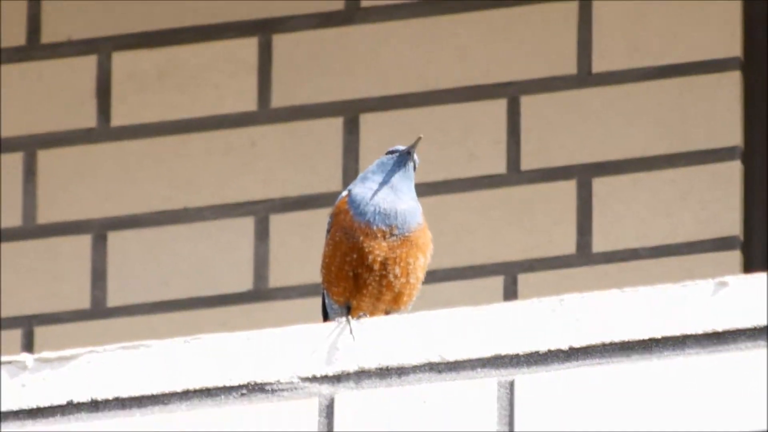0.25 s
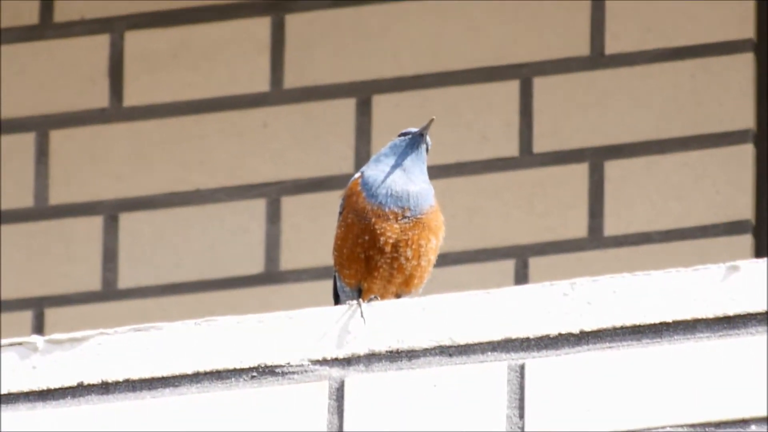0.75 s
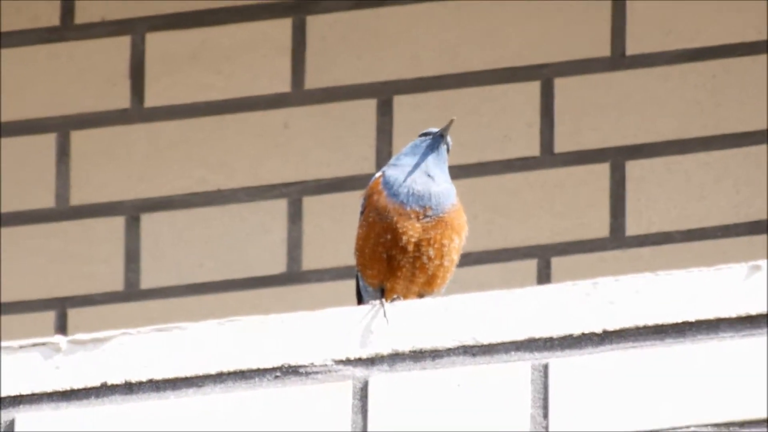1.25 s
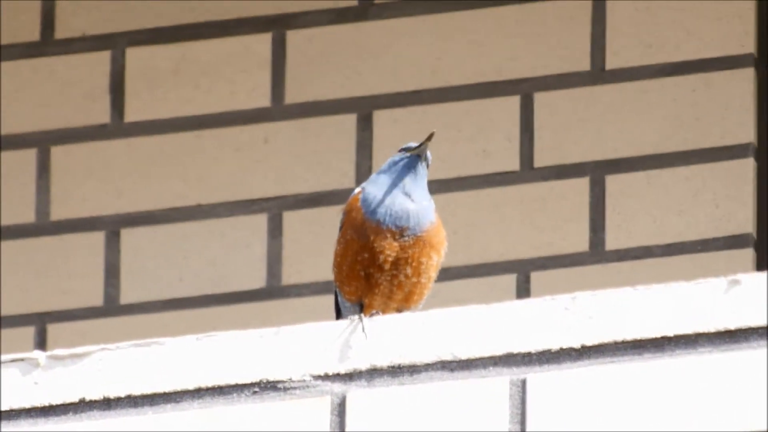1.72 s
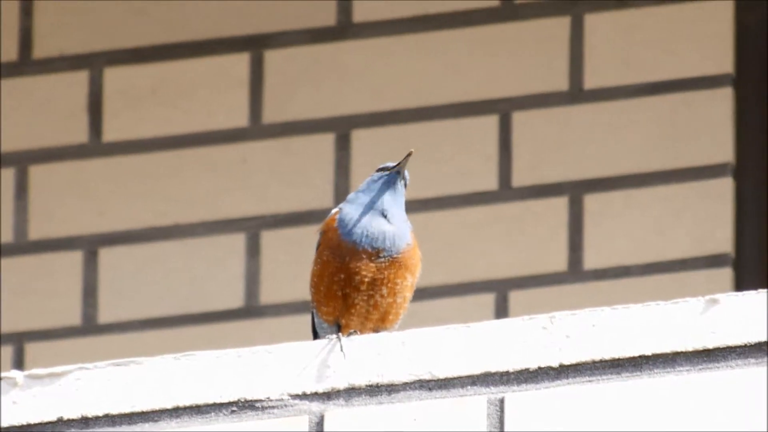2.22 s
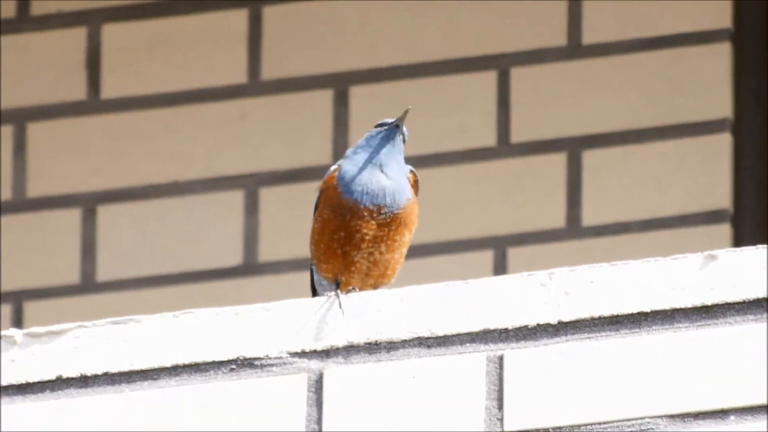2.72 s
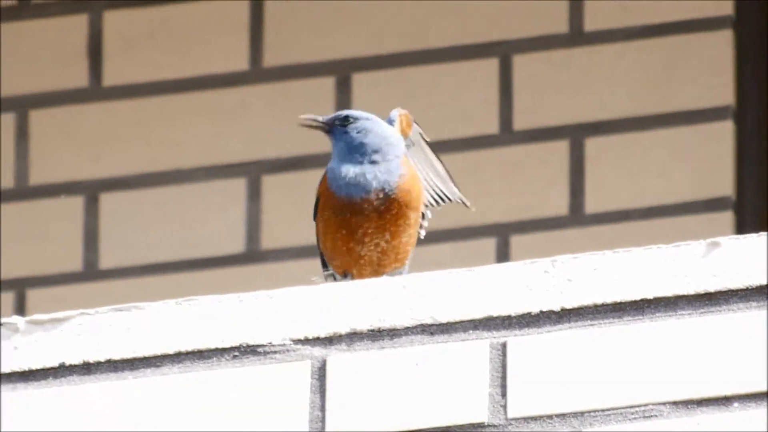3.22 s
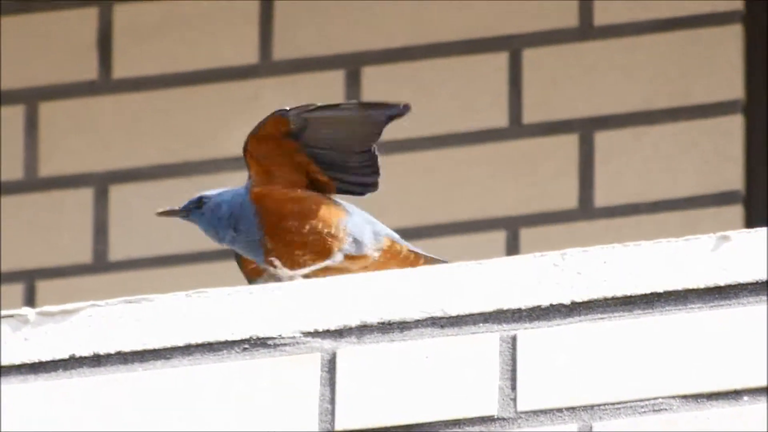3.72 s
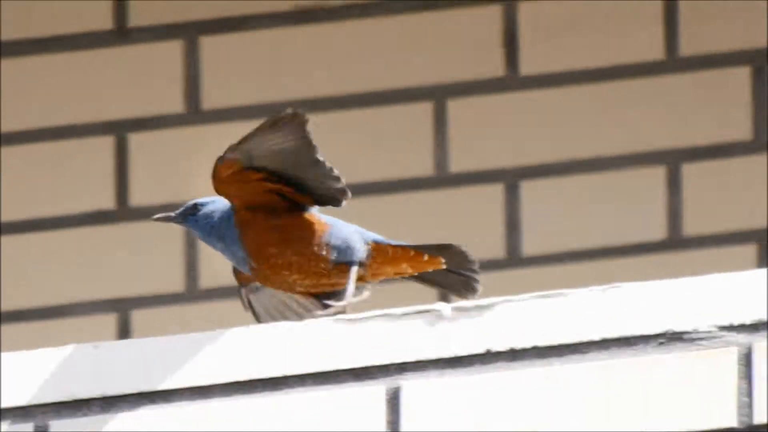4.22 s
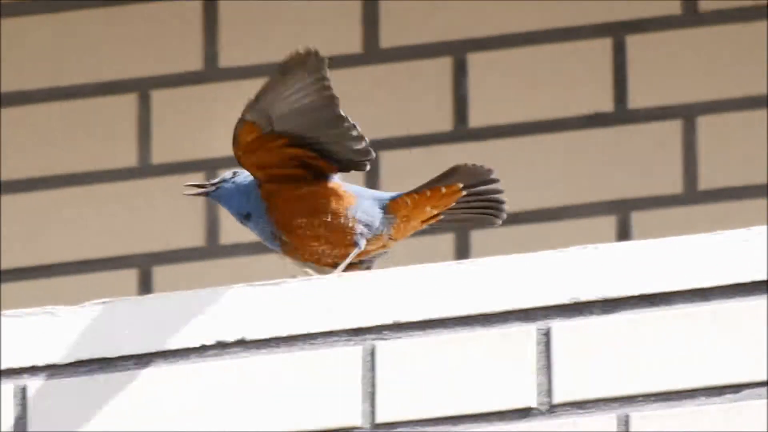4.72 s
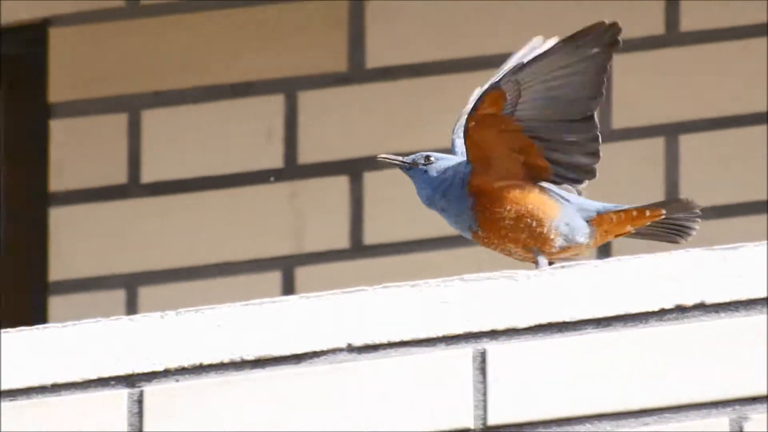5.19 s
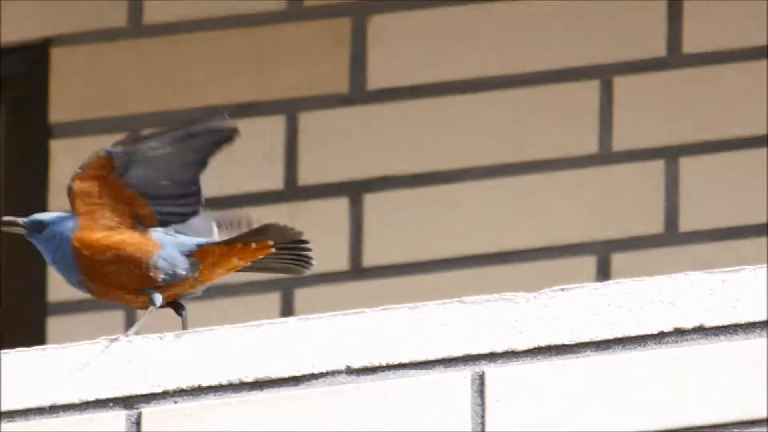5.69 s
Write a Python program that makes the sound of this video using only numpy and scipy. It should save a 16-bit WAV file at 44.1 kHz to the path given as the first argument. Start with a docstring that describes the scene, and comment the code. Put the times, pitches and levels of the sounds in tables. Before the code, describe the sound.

Loud low wind buffeting on a microphone, over distant traffic, as a perched thrush sings clear fluting notes, raspy buzzes and quick trills.

```python
"""A blue rock thrush sings on a balcony wall: clear whistles, fluttering trills and two harsh falling buzzes,
built as gliding sines with overtones and thrown back by the house fronts as echoes and a noise tail.
A sharp dry tick sounds once. Gusts rumble on the microphone as lumpy low noise, and single eddies thump it.
Behind lie random far chirps, the filtered noise of a town, a faint hum and a vehicle that draws near at the end.
The recorder's compressor ducks under the loudest peaks and recovers slowly."""
import sys
import numpy as np
from scipy import signal
from scipy.fft import rfft, irfft
from scipy.io import wavfile
from scipy.ndimage import uniform_filter1d, minimum_filter1d, map_coordinates

SR = 44100
rng = np.random.default_rng(int(sys.argv[2]) if len(sys.argv) > 2 else 0)


def store_pcm(level_fs):
    """Save levels as 16-bit WAV."""
    pcm = np.round(np.clip(level_fs, -1, 1) * 32767).astype(np.int16)
    wavfile.write(sys.argv[1], SR, np.atleast_2d(pcm).T)


N = 262395
TIME = np.arange(N) / SR

# Clear notes of the thrush. Each row: start in seconds, length in seconds, first pitch in Hz,
# last pitch in Hz, level in dB at mid-note, swell from start to end in dB.
WHISTLES = [ (1.435, 0.054, 6000, 3950, -53, 10), (1.478, 0.053, 2930, 2936, -35.5, 1),
            (1.674, 0.11, 2910, 2286, -35, 17.5), (1.851, 0.022, 6760, 6330, -46.5, 2.5),
            (2.103, 0.071, 4236, 3580, -27.5, 11.5), (2.172, 0.062, 3526, 3533, -24.5, 9),
            (2.250, 0.066, 3405, 3519, -21.5, -2), (2.34, 0.11, 3286, 3500, -27.5, -9),
            (2.459, 0.048, 1880, 2260, -38, 23), (2.789, 0.12, 6950, 6300, -54, -3),
            (3.424, 0.069, 3540, 3153, -38, 8), (3.991, 0.066, 3620, 3193, -42, 17),
            (5.149, 0.042, 4750, 4744, -23.5, -13), (5.439, 0.053, 3700, 3077, -33.5, 14),
            (5.582, 0.08, 2440, 2845, -36.5, 8), (5.765, 0.089, 7750, 7100, -53, -3)]
# Fluttering notes of the thrush. Each row: start in seconds, length in seconds, first pitch in Hz,
# last pitch in Hz, level in dB at mid-note, depth of the main flutter swing in Hz.
TRILLS = [ (.70, 0.19, 4410, 3500, -48.5, 700), (0.771, 0.047, 3550, 3150, -41, 350),
          (1.394, 0.041, 6400, 7200, -54, 300), (1.781, 0.027, 6500, 4030, -42, 1540),
          (1.835, .064, 2320, 2816, -26.5, 101), (1.896, 0.069, 2760, 3180, -22.5, 113),
          (1.962, 0.04, 3180, 2784, -24.5, 130), (2.010, 0.038, 3140, 2867, -26.5, 260),
          (2.658, .024, 2596, 3674, -33.5, 600), (2.673, 0.0425, 2995, 2490, -31, 278),
          (4.801, 0.03, 2295, 2620, -35, 250), (4.819, .022, 2700, 4660, -29, 400),
          (4.836, 0.043, 4870, 4900, -35, 260), (4.840, .055, 5430, 5350, -40, 90),
          (4.894, 0.043, 4830, 3420, -36, 198), (4.931, 0.077, 3630, 3104, -39, 170),
          (4.916, 0.11, 2520, 2230, -40.5, 120), (5.096, 0.042, 6350, 5730, -41.5, 130),
          (5.134, 0.0615, 5640, 5250, -29.5, 220), (5.120, 0.073, 4986, 4740, -27, 110),
          (5.208, 0.04, 4140, 4255, -24.5, 200), (5.286, 0.031, 3754, 4400, -27, 333)]
# Trills and squeaks share one mean flutter rate; all trills but the slow rattle swell alike.
FLUTTER_HZ, TRILL_SWELL_DB = 253.4, 3
# Harsh calls, a screech that breaks into a falling buzz. Each row: start of the screech in seconds,
# level of the buzz in dB, length of the buzz in seconds, its last pitch in Hz, its flutter rate in Hz.
BUZZES = [(3.051, -25, .119, 3983, 79.9), (3.678, -26, 0.13, 3860, 140)]
# Thin squeaks whose octave outweighs the fundamental. Each row: start in seconds, length in seconds,
# level of the fundamental in dB.
SQUEAKS = [(4.564, 0.076, -47), (4.635, 0.12, -47.5)]
# Tone of the windpipe and beak, which favour two bands. Each row: frequency in Hz, gain in dB.
BEAK = [(6000, -0.5), (7500, -1), (9700, -6.5), (11200, -2), (12200, 1), (13300, -21)]
# Echoes off nearby walls, before the walls' colour. Each row: delay in seconds, level in dB.
WALL_ECHOES = [(.0065, -5.5), (.021, -8), (.047, -14), (.079, -15)]
# Gusts on the microphone. Each row: peak time in seconds, level in dB before the common gust trim,
# build-up in seconds, dying away in seconds.
GUSTS = [(0.071, -12.5, 0.04, 0.058), (0.209, -9, 0.076, 0.048), (.78, -31, 0.22, 0.055),
         (1.244, -14, 0.05, 0.086), (1.96, -24, 0.06, 0.072), (2.80, -11.5, 0.23, 0.13),
         (3.099, -18, .04, 0.062), (3.321, -16, 0.066, 0.042), (3.549, -8, 0.11, .1),
         (4.74, -28, 0.17, 0.13), (5.02, -17, 0.11, 0.026), (5.14, -23, 0.052, 0.065), (5.68, -26, .11, .2)]
# Strongest single eddies striking the microphone. Each row: start in seconds, strength in dB before
# the common trims.
BUFFETS = [(.048, -3.5), (.14, 5), (.328, -11), (0.5, -14), (0.818, -16.5), (.869, -12), (1.238, -4),
           (1.28, -18.5), (1.53, -10), (2.125, 1.5), (2.349, -10.5), (2.444, -8.5), (2.677, 1), (2.761, 0),
           (3.298, -9), (3.434, 8), (4.101, -12), (4.211, -9), (4.626, -14), (4.936, -4.5), (5.732, -6.5)]
# Harder eddies thump higher: reference pitch at a strength of 0 dB, and the dB that double it.
THUMP_HZ, THUMP_OCTAVE_DB = 355.8, 24.5
# Median strength of the breeze between gusts.
BREEZE_DB = -41.5
# Spectral shape of the turbulence. Each row: frequency in Hz, relative level in dB.
WIND_SPECTRUM = [(10, -59), (30, -61), (80, -18.5), (170, -1), (290, 1.5), (420, -8), (640, -22),
                 (900, -37.5), (1800, -68), (4000, -100)]
# Share of small, brighter eddies as the wind veers. Each row: time in seconds, gain in dB.
FINE_EDDIES = [(0, 2.5), (1.5, -8), (2.85, 8), (3.1, -15), (5.95, -7.5)]
# Spectral shape of the far traffic. Each row: frequency in Hz, relative level in dB.
TOWN_SPECTRUM = [(10, -44), (28, -30.5), (70, 3), (200, 8.5), (400, -1), (750, -1.5), (1850, -18.5),
                 (2300, -13.5), (2700, -23.5), (4500, -23), (15500, -44.5)]
# Level of the far traffic before its bass and treble waver.
TOWN_DB = -36.5
# Spectral shape of the vehicle's tyres. Each row: frequency in Hz, relative level in dB.
TYRE_SPECTRUM = [(30, -33), (200, -5.5), (900, -7), (1400, -11), (2000, -16), (9000, -39.5), (15000, -54)]
# The far vehicle's course in loudness, before wavering. Each row: time in seconds, level in dB.
VEHICLE = [(0, -54), (1.8, -41), (3.8, -53), (5.3, -45.5), (5.9, -33.5)]
# How much far sound differs between the ears. Each row: frequency in Hz, side gain in dB against mid.
WIDTH = [(100, -15.5), (600, -17.5), (3500, -17)]
# Treble response of the microphone port. Each row: frequency in Hz, gain in dB.
MICROPHONE = [(8400, 2), (9150, -3.5), (9900, 3.5)]
# The recorder cuts everything above this.
TOP_HZ = 15700


def undb(db):
    """Decibels to gain."""
    return 10 ** (np.asarray(db) / 20)


def unit(x):
    """Scale to rms 1."""
    return x / np.sqrt(np.mean(x ** 2))


def colour(x, points):
    """Filter by a curve of (Hz, dB) points, joined on a logarithmic frequency scale."""
    hz, db = np.transpose(points)
    bins = np.maximum(np.fft.rfftfreq(N, 1 / SR), 1)
    gain = undb(np.interp(np.log(bins), np.log(hz), db))
    return irfft(rfft(x) * gain, N)


def curve(points):
    """Follow (seconds, value) points along the scene."""
    return np.interp(TIME, *np.transpose(points))


def low_part(x, cutoff_hz):
    """Keep the bass without shifting it in time."""
    return signal.sosfiltfilt(signal.butter(2, cutoff_hz, fs=SR, output="sos"), x)


def walk(rate, size):
    """Smooth random drift of spread near 1, shaped by about rate random points a second."""
    place = np.arange(size) * rate / SR
    return map_coordinates(rng.standard_normal(4096), [place], order=2, mode="wrap")


def stereo(mid, side):
    """Left and right from what they share and what differs."""
    return np.array([mid + side, mid - side])


def add(track, start, sound):
    """Mix a sound into a track at a time in seconds."""
    first = max(int(start * SR), 0)
    part = sound[:max(N - first, 0)]
    track[first:first + len(part)] += part


def thrush(rasp_share=0.34, squeak_hz=3380, squeak_rise=1.05, harsh_db=-25, harsh_octave_db=19):
    """Whistles, trills raspier with depth and richer with pitch, harsh calls and squeaks; notes may overlap."""
    song = rattle()
    for start, *shape in WHISTLES:
        add(song, start, note(*shape, overtone_db=-31, rasp_hz=24))
    for start, length, first, last, db, depth in TRILLS:
        rasp_hz = min(rasp_share * depth, 110)
        # harsh_db is the octave's level for a last pitch of 3800 Hz
        overtone_db = harsh_db + harsh_octave_db * np.log2(last / 3800)
        trill = note(length, first, last, db, TRILL_SWELL_DB, depth, FLUTTER_HZ, overtone_db, rasp_hz)
        add(song, start, trill)
    for start, *shape in BUZZES:
        add(song, start, buzz(*shape))
    for start, length, db in SQUEAKS:
        squeak = note(length, squeak_hz / squeak_rise, squeak_hz, db, depth_hz=186, rate_hz=FLUTTER_HZ,
                      overtone_db=6.5, rasp_hz=92, edge_s=0.017)
        add(song, start, squeak)
    return colour(song, BEAK)


def note(length_s, first_hz, last_hz, db, swell_db=0, depth_hz=0, rate_hz=0, overtone_db=-37.0, rasp_hz=31,
         edge_s=0.0072, pulsing=0.18, upper_db=-35, settle=1.55):
    """One syllable: the syrinx settles on a pitch while a slower flutter shakes its pitch and loudness."""
    size = int(length_s * SR)
    along = np.linspace(0, 1, size)
    # a settle above 1 glides fast at first and eases into the last pitch
    glide = last_hz + (first_hz - last_hz) * (1 - along) ** settle

    uneven_hz = min(.16 * rate_hz, 85)
    cycle = 2 * np.pi * np.cumsum(rate_hz + uneven_hz * walk(rate_hz, size)) / SR
    # each flutter snaps up and sinks back
    flutter = np.sin(cycle) + .35 * np.sin(2 * cycle)
    rasp = rasp_hz * walk(594.9, size)
    phase = 2 * np.pi * np.cumsum(glide + depth_hz * flutter + rasp) / SR

    nearest_end_s = np.minimum(along, 1 - along) * length_s
    edges = np.sin(np.pi / 2 * np.minimum(nearest_end_s / edge_s, 1)) ** 2
    swell = undb(db + swell_db * (along - .5))
    loudness = swell * edges * (1 + pulsing * flutter)

    # the membranes close unevenly, which adds an octave and two upper overtones
    octave = undb(overtone_db) * np.sin(2 * phase)
    upper = sum((k * glide < SR / 2) * np.sin(k * phase) for k in (3, 4))
    # upper_db holds when the octave is at -28 dB; a stronger octave lifts the upper ones too
    upper_gain = undb(upper_db + (overtone_db + 28.0) * 0.83)
    return np.sqrt(2) * loudness * (np.sin(phase) + octave + upper_gain * upper)


def buzz(db, length_s, last_hz, rate_hz, screech_s=.071, fall=1.21, shake_hz=920):
    """A screech, shaken so fast that it splits into side tones, breaks into a falling buzz as it weakens."""
    screech = note(screech_s, 5280, 5130, db - 3, swell_db=-5, depth_hz=480, rate_hz=shake_hz,
                   overtone_db=-8, rasp_hz=105, edge_s=.012, upper_db=-45)
    falling = note(length_s, fall * last_hz, last_hz, db, swell_db=2, depth_hz=170, rate_hz=rate_hz,
                   overtone_db=-16, rasp_hz=90, edge_s=.004, upper_db=-45, settle=1.25)
    shaken = note(length_s, 5450, 5100, db - 12, swell_db=-7, depth_hz=560, rate_hz=shake_hz,
                  overtone_db=-13, rasp_hz=180, upper_db=-45)
    return np.concatenate([screech, falling + shaken])


def rattle(at_s=2.518, length_s=0.084, hz=2780, db=-30, depth_hz=380, rate_hz=56):
    """One trill so slow that its single sweeps are heard."""
    song = np.zeros(N)
    sweeps = note(length_s, hz, hz, db, depth_hz=depth_hz, rate_hz=rate_hz, overtone_db=-26, rasp_hz=50,
                  pulsing=.45, upper_db=-22)
    add(song, at_s, sweeps)
    return song


def courtyard(song, t60_s=0.84, tail_db=-10, build_s=0.035, side_db=-23):
    """House fronts return a few echoes and a diffuse noise tail, both duller at the very top."""
    age = np.arange(SR) / SR
    shape = undb(-60 * age / t60_s) * (1 - np.exp(-age / build_s))
    tails = rng.standard_normal((2, SR)) * shape / np.sqrt(np.sum(shape ** 2))
    mid, side = (signal.fftconvolve(song, tail)[:N] for tail in tails)
    echoes = np.zeros(N)
    for delay, db in WALL_ECHOES:
        add(echoes, delay, undb(db) * song)
    wet = stereo(echoes + undb(tail_db) * mid, undb(side_db) * side)
    return song + colour(wet, [(2000, 4), (5000, 1.5), (8000, 1.0), (13000, -5.5)])


def tick(at_s=5.1557, db=-11, decay_s=0.0017):
    """One sharp dry tick close by: a burst of noise that dies within milliseconds, then is coloured."""
    age = np.arange(SR // 40) / SR
    burst = undb(db) * rng.standard_normal(len(age)) * np.exp(-age / decay_s)
    click = np.zeros(N)
    add(click, at_s, burst)
    return colour(click, [(900, 9.5), (2500, -10), (9000, 3), (14000, -16)])


def wind(gust_db=-1, buffet_db=-2, wake_db=-13, side_db=-15, cycles=0.57, sag=0.44, rise_s=0.00868,
         restless_db=3):
    """Gusts swell out of a restless breeze; single eddies thump the diaphragm, sag in pitch and stir a wake."""
    strength = undb(BREEZE_DB + restless_db * walk(16, N))
    for peak, db, build, die in GUSTS:
        width = np.where(TIME < peak, build, die)
        strength = strength + undb(gust_db + db) * np.exp(-((TIME - peak) / width) ** 2)

    thumps = np.zeros(N)
    # age counts from the height of the thump, so it starts below zero
    age = np.arange(SR // 20) / SR - rise_s
    onset = np.minimum((age + rise_s) * 2 / rise_s, 1)
    for (start, db), turn in zip(BUFFETS, rng.random(len(BUFFETS))):
        hz = THUMP_HZ * 2 ** (db / THUMP_OCTAVE_DB)
        phase = np.cumsum(hz * (1 - sag * np.tanh(age / rise_s))) / SR
        # a higher thump is shorter
        hump = onset / np.cosh(age * hz / cycles)
        add(thumps, start, undb(db + buffet_db) * hump * np.sin(2 * np.pi * (phase + turn)))
        add(strength, start, undb(db + wake_db) * onset / np.cosh(age / rise_s))

    mid = strength * eddies() + thumps
    # the side has its own turbulence and the thumps a millisecond late
    side = strength * eddies() + np.roll(thumps, SR // 1000)
    return stereo(mid, undb(side_db) * side) * undb(np.array([[-.6], [.6]]))


def eddies(spread_db=5.0):
    """Turbulence: a low rumble in lumps a few cycles long, with more or fewer small eddies on top."""
    lumps = colour(rng.standard_normal(N) * undb(spread_db * walk(130, N)), WIND_SPECTRUM)
    large = low_part(lumps, 400)
    lumps = large + (lumps - large) * undb(curve(FINE_EDDIES))
    # even out the loudness over 40 ms, so that the wind strength sets it
    return lumps / np.sqrt(uniform_filter1d(lumps ** 2, SR // 25))


def far_birds(count=20, db=-57, length_s=0.07, low_hz=2500, high_hz=6500, fall=0.37):
    """Other birds some way off drop faint chirps at random; the higher ones fall further."""
    chirps = np.zeros(N)
    for when, height, stretch in rng.random((count, 3)):
        hz = low_hz * (high_hz / low_hz) ** height
        chirp = note(length_s * (.5 + stretch), hz, hz * (1 - fall * height), db, rasp_hz=150)
        add(chirps, when * N / SR, chirp)
    return chirps


def town(hum_hz=701, hum_db=-52):
    """Far traffic and tyres as filtered noise, with a faint wandering hum as a sine."""
    traffic = undb(TOWN_DB) * wash(TOWN_SPECTRUM, waver_db=2.5)
    tyres = undb(curve(VEHICLE)) * wash(TYRE_SPECTRUM, waver_db=1.6)
    hum_phase = 2 * np.pi * np.cumsum(hum_hz + 8 * walk(25, N)) / SR
    hum = undb(hum_db + 3 * walk(7, N)) * np.sin(hum_phase)
    return (traffic + tyres + hum) * undb(np.array([[.8], [-.8]]))


def wash(points, waver_db):
    """Distant noise, set to rms 1 before its bass and treble waver on their own, the bass twice as far."""
    mid, side = (colour(rng.standard_normal(N), points) for _ in range(2))
    both = unit(stereo(mid, colour(side, WIDTH)))
    bass = low_part(both, 450)
    treble = both - bass
    return bass * undb(2 * waver_db * walk(22, N)) + treble * undb(waver_db * walk(5.94, N))


def scene():
    """The thrush and its far neighbours in the courtyard, a tick, the wind and the town."""
    return courtyard(thrush() + far_birds()) + tick() + wind() + town()


def record(dry, release_s=0.46):
    """The microphone port notches the treble; a compressor ducks under peaks; the top is cut."""
    heard = colour(dry, MICROPHONE)
    peak = np.maximum(np.abs(heard).max(axis=0), 1e-9)
    # hold each peak and let it sink with the release time constant
    held = np.exp(np.maximum.accumulate(np.log(peak) + TIME / release_s) - TIME / release_s)
    compressor = np.minimum(.8 / held, 1) ** .55
    # a fast limiter takes what the gentle compressor lets through
    gain = np.minimum(compressor, .97 / peak)
    gain = uniform_filter1d(minimum_filter1d(gain, SR // 200), SR // 200)
    top_cut = signal.ellip(10, .2, 80, TOP_HZ, fs=SR, output="sos")
    return signal.sosfilt(top_cut, heard * gain)


dry = scene()
out = record(dry)
store_pcm(out)
```